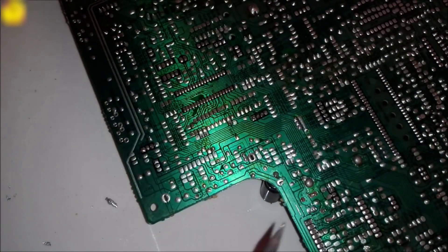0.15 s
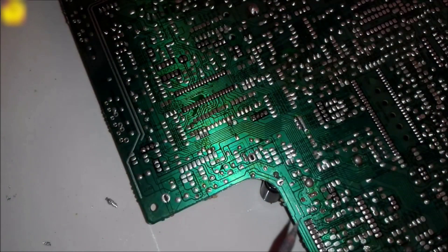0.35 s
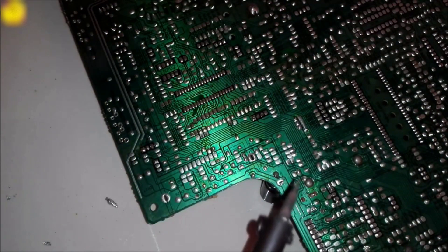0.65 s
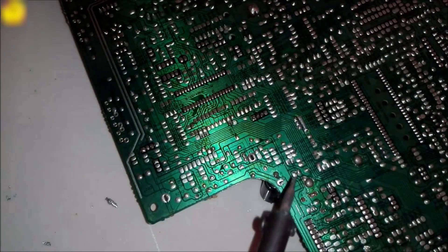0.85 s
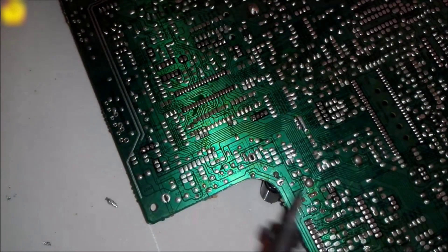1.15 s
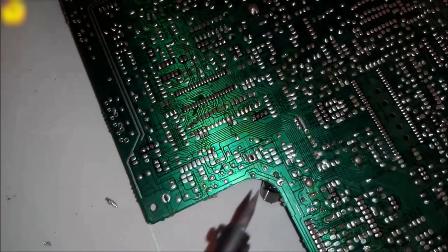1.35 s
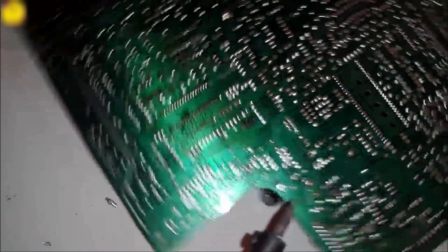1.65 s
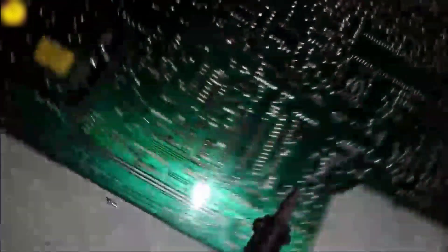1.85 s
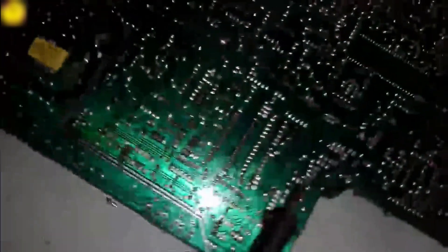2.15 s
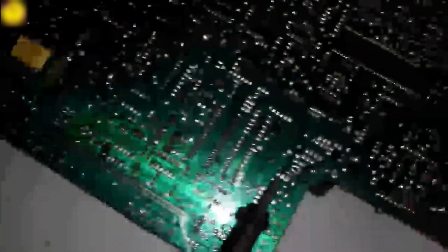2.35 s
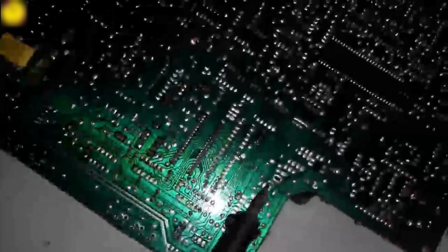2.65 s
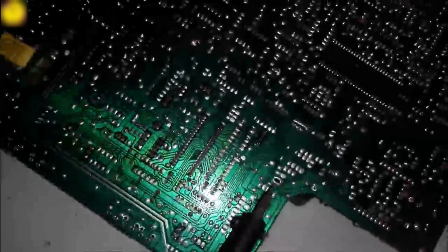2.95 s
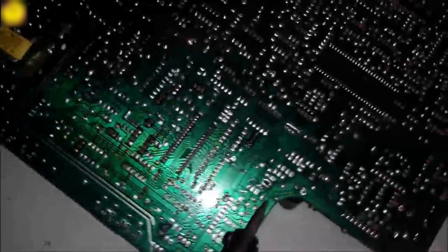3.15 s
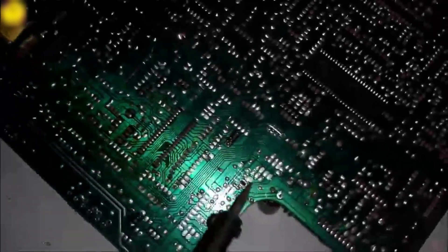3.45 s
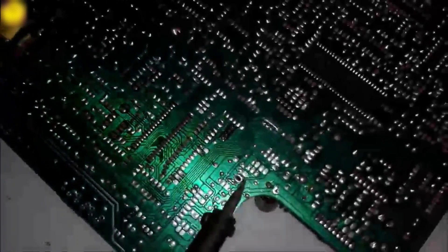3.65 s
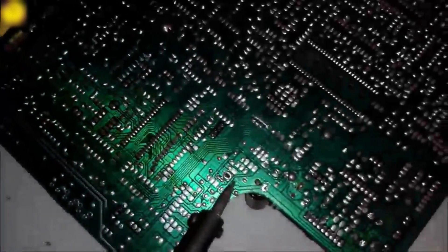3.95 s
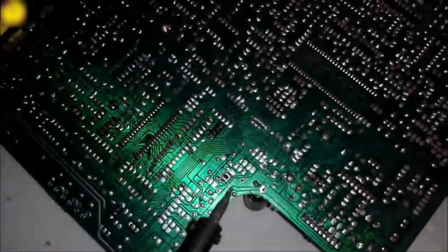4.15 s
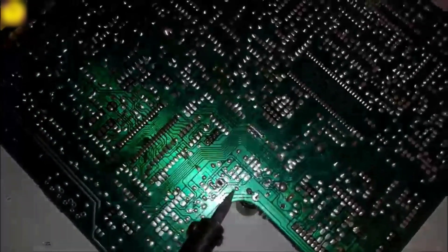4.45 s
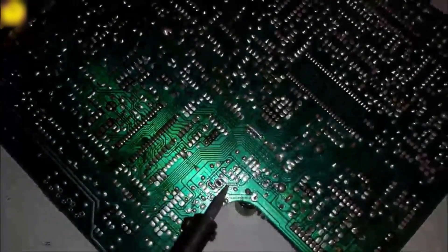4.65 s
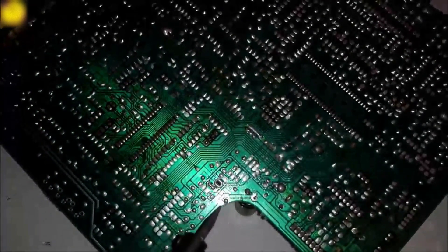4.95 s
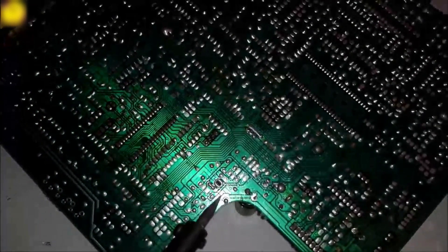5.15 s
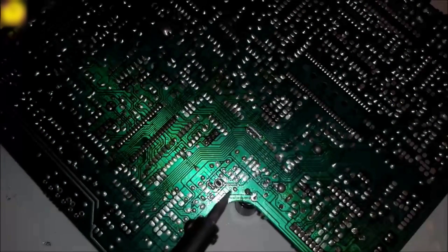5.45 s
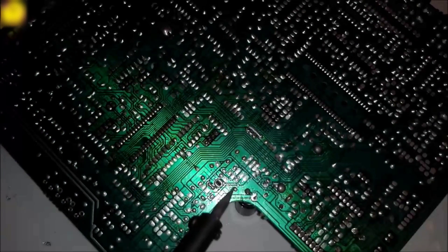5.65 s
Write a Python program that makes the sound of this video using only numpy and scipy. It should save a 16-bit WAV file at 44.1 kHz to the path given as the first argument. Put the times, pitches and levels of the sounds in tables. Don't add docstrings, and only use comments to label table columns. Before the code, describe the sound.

On a workbench in a small hard room, close-miked: a click, a very loud plastic snap and a second snap from a spring pump; a pause; a quick squealing scrape as a circuit board turns and drops; two bright ringing taps from an iron tip, light bounces, small scratchy slips, then quiet hiss and low bench rumble.

```python
import sys
import numpy as np
from scipy import signal
from scipy.fft import rfft, irfft
from scipy.io import wavfile

SR = 44100
rng = np.random.default_rng(int(sys.argv[2]) if len(sys.argv) > 2 else 0)


def boost_factor(decibels):
    exponent = np.asarray(decibels, float) / 20
    return 10 ** exponent


def generate_wav(signal):
    frames = np.transpose(np.atleast_2d(signal))
    scaled = np.clip(frames, -1, 1) * 32767
    pcm = np.round(scaled).astype(np.int16)
    wavfile.write(sys.argv[1], SR, pcm)


N = 255339


def noise():
    return rng.standard_normal(N)


def band(x, low_hz, high_hz):
    return signal.sosfilt(signal.butter(2, [low_hz, high_hz], "band", fs=SR, output="sos"), x)


def rms_one(x):
    return x / np.sqrt(np.mean(x ** 2) + 1e-20)


def coloured(x, spectrum):
    hz, db = np.transpose(spectrum)
    grid = np.fft.rfftfreq(len(x), 1 / SR) + 1
    gain = boost_factor(np.interp(np.log(grid), np.log(hz), db))
    return rms_one(irfft(rfft(x) * gain, len(x)))


def ring(x, hz, t60):
    r, w = boost_factor(-60 / (t60 * SR)), 2 * np.pi * hz / SR
    return signal.lfilter([0, np.sin(w)], [1, -2 * r * np.cos(w), r * r], x)


def swell(s, db, rise_s, fall_s):
    late = np.arange(N) / SR - s
    drop = np.maximum(np.minimum(-late / rise_s, 15), np.minimum(late / fall_s, 15))
    return boost_factor(db - 20 * drop)


def swells(rows):
    return sum(swell(*row) for row in rows)


def grains(per_s, colour):
    sizes = boost_factor(3 * np.minimum(rng.exponential(1, N), 5)) * rng.choice([-1, 1], N)
    return coloured(sizes * (rng.random(N) < per_s / SR), colour)


def scattered_click(shape_db, grid, spread_s, direct):
    half = len(grid) - 1
    fold = np.r_[1, 2 * np.ones(half - 1), 1, np.zeros(half - 1)]
    click = np.exp(rfft(irfft(np.log(boost_factor(shape_db))) * fold))
    scatter = 1
    for lag in np.round(spread_s * SR * rng.uniform(.7, 1.1, 5) * [.07, .13, .27, .55, 1]) + 1:
        late = np.exp(-2j * np.pi * (grid - 1) * lag / SR)
        scatter = scatter * (late - .68) / (1 - 0.7 * late)
    return irfft(click * (scatter - direct))


def strikes(events, colour, spread_s, direct, modes=()):
    out, size = np.zeros((2, N + SR)), 2 ** 13
    grid = np.fft.rfftfreq(size, 1 / SR) + 1
    hz, db = np.transpose(colour)
    body_db = np.interp(np.log(grid), np.log(hz), db)
    for s, peak_db, low_db, top_db, room_db in events:
        tilt_db = np.interp(np.log(grid), np.log([1500, 3000, 8000]), [low_db, 0, top_db])
        hit = scattered_click(body_db + tilt_db, grid, spread_s, direct)
        rings = 0 * hit
        for mode_hz, mode_db, t60 in modes:
            mode_gain = boost_factor(mode_db - 17.0 + rng.normal(0, 3.2))
            rings = rings + mode_gain * ring(hit, mode_hz, min(t60, .07))
        near = hit + rings
        far = boost_factor(room_db) * (1.315 * hit + .5 * rings)
        out[:, round(s * SR):][:, :size] += boost_factor(peak_db) * np.array([near, far]) / np.abs(near).max()
    return out[:, :N]


# frequency in Hz, level in dB per Hz.
HISS_COLOUR = [(180, -43.5), (300, -9.5), (342, -1.5), (411, -12.5), (446, -15), (641, -15), (985, -13),
               (1120, -11.5), (1350, -11.5), (2360, -18.5), (2830, -16.5), (3940, -20), (14300, -24),
               (15500, -31)]


def preamp_hiss():
    return boost_factor(-72.5) * coloured(noise(), HISS_COLOUR)


# frequency in Hz, level in dB per Hz.
RUMBLE_COLOUR = [(12, -32.5), (20, 0), (43, 7), (63, 1), (115, -5), (292, -20), (348, -28), (443, -32.5),
                 (500, -41.5), (650, -57), (1100, -120)]
# start in seconds, level in dB, t60 in seconds.
THUDS = [
    (1.809, -40.5, 0.35),
    (2.389, -34.5, 0.45),
    (3.645, -37, 0.5),
    (3.771, -53, 0.22),
    (3.876, -50.5, 0.65),
    (3.995, -52.5, 0.18),
    (4.49, -44, 0.28),
]
# peak in seconds, level in dB, rise in seconds, fall in seconds.
LEANS = [
    (1.74, -63, 0.46, 0.3),
    (1.95, -55.5, 0.05, 0.15),
    (2.4, -57.5, 0.23, 0.17),
    (2.69, -69.5, .2, .4),
    (3.29, -59.5, 0.6, 0.33),
    (3.82, -49.5, 0.28, 0.365),
    (4.61, -58, 0.39, 0.68),
    (5.32, -69.5, 0.56, 0.5),
]


def bench():
    t = np.arange(N) / SR
    level = boost_factor(-57.5 - 0.73 * t) + swells(LEANS)
    for s, db, t60 in THUDS:
        onset = (t > s) * np.clip((t - s) / 0.0056, 0, 1)
        level = level + onset * boost_factor(db - 60 * np.abs(t - s) / t60)
    return level * band(coloured(noise(), RUMBLE_COLOUR), 40, 2000)


# peak in seconds, level in dB, rise in seconds, fall in seconds.
WHINE_SWELL = (5, -83.5, 0.27, 2)
# peak in seconds, level in dB, rise in seconds, fall in seconds.
SQUEAKS = [
    (2.95, -72, .3, .3),
    (3.1, -80, .2, 0.034),
    (3.29, -77.5, 0.26, .1),
]


def squeak():
    whine = swell(*WHINE_SWELL) * rms_one(ring(noise(), 2838, .012))
    turns = 1692 * np.arange(N) / SR
    tone = np.sin(2 * np.pi * turns) + 0.84 * np.sin(np.pi * turns)
    return whine + swells(SQUEAKS) * tone


# frequency in Hz, t60 in seconds, level in dB.
ROOM_DECAY = [(203, 0.23, -3), (464, 0.35, 3), (1166, 0.32, -3), (3500, 0.33, -2.5), (7113, 0.28, -3.5),
              (13800, 0.063, 3.5)]


def room(x):
    t, tail = np.arange(SR // 2) / SR, 0
    hz, t60, db = np.transpose(ROOM_DECAY)
    edges = 150 * 2 ** np.arange(0, 7.1, .5)
    for low, high in zip(edges, edges[1:]):
        centre = np.log(low * high) / 2
        band_db = np.interp(centre, np.log(hz), db)
        band_t60 = np.interp(centre, np.log(hz), t60)
        tail = tail + band(rng.standard_normal(len(t)), low, high) * boost_factor(band_db - 60 * t / band_t60)
    tail = tail * np.clip((t - .006) / 0.0011, 0, 1)
    return signal.fftconvolve(x, tail / np.sqrt(np.sum(tail ** 2)))[:N]


# start in seconds, pitch in Hz, level in dB, t60 in seconds.
RINGS = [(.301, 940, -47.5, 0.095), (.371, 764, -39, 0.11), (0.778, 2740, -52.5, 0.084),
         (1.469, 1027, -37, 0.127), (1.685, 1410, -25.5, 0.06), (1.686, 4600, -35.5, .06),
         (1.686, 7070, -40.5, .05), (2.857, 1360, -49.5, 0.087), (2.871, 1162, -62, 0.15),
         (3.037, 1348, -57, 0.064), (3.873, 1090, -36, 0.34), (3.991, 1093, -34.5, 0.24),
         (4.389, 1348, -49, .1), (4.39, 2640, -44.5, 0.049), (4.486, 1140, -36, 0.14),
         (4.678, 1140, -43.5, 0.137), (1.868, 930, -23, 0.067), (1.882, 873, -21.5, .06),
         (1.875, 1590, -22, 0.089), (1.905, 1178, -28, 0.17), (2.39, 1107, -26.5, .35),
         (2.389, 1570, -30, 0.12), (1.925, 290, -32.5, .3), (1.88, 685, -38, 0.51), (2.4, 320, -45.5, .4),
         (1.469, 4970, -34, 0.0475), (1.48, 1120, -52, .4), (2.859, 5176, -58, 0.081),
         (2.859, 3760, -54.5, .12), (2.86, 4370, -50, 0.15), (3.3, 1507, -59.5, 0.23),
         (3.355, 927, -57, .12), (3.399, 1590, -61, 0.18), (3.769, 1081, -33, 0.19),
         (3.644, 1114, -35.5, 0.26), (3.994, 2360, -41, 0.163), (4.39, 5130, -34, 0.11),
         (4.485, 5220, -38, .08), (4.484, 1510, -34, .1), (4.587, 5070, -38, .1), (4.588, 1350, -46, .1),
         (4.676, 5090, -42, .08), (4.677, 940, -41.5, 0.16), (4.678, 1523, -35, 0.104),
         (4.769, 2700, -56, .06), (4.769, 5190, -51, .1), (0.778, 7500, -53, .1), (.781, 10100, -44, 0.063),
         (1.813, 354, -53.5, .2), (1.928, 345, -49.5, .2)]


def after_rings():
    out, t = np.zeros(N), np.arange(SR // 2) / SR
    for s, hz, db, t60 in RINGS:
        tremble = rng.standard_normal(len(t)) * boost_factor(-60 * t / t60) * (.35 + (t < .003))
        ping = ring(tremble, hz, min(t60 / 2, 70 / hz, .08))
        out[round(s * SR):][:len(ping)] += boost_factor(db) * ping / np.abs(ping).max()
    return out


# pitch in Hz, level in dB, t60 in seconds.
JOINTS = [(966, -23.5, 0.048), (1225, -25.5, 0.058), (1555, -24.5, 0.031), (1806, -27, 0.038),
          (2930, -27, 0.015), (4510, -21, 0.068), (5256, -13, 0.02), (6367, -21, 0.025)]
# start in seconds, peak in dB, low tilt in dB, top tilt in dB, room in dB.
SHIFTS = [(1.468, -28.5, 6.5, 7.5, -8.5), (1.7174, -22.5, 1, -24, -21.5), (1.8043, -18.5, 0, -2, -11.5),
          (1.8285, -21, -4.5, -8, -11.5), (1.8427, -28, -8, -0.5, -12.5), (1.8487, -23, -6.5, 0, -12),
          (1.862, -22.5, -7, 1, -12), (1.8742, -13.5, -3, 1, -22.5), (1.881, -11.5, 1.5, 6.5, -13.5),
          (1.8865, -14, 1.5, 1.5, -14), (1.893, -21.5, 0.5, 0.5, -17.5), (1.926, -31.5, 2.5, -4, -10),
          (1.939, -33, 0, 0, -2), (2.0185, -32.5, -6.5, -7.5, -10.5), (2.046, -39, 7, 2, -8),
          (2.8575, -48, -7.5, -3, -5), (3.035, -58, 9, -7, -6.5)]
# frequency in Hz, level in dB per Hz.
SHIFT_COLOUR = [(180, -52.5), (300, -35), (568, -16.5), (991, -2), (1370, -2), (1790, -2.5), (2360, -14.5),
                (3730, -8.5), (4470, -17.5), (4850, -9.5), (10600, -24), (12300, -29), (14000, -47),
                (15000, -60.5)]
# start in seconds, peak in dB, low tilt in dB, top tilt in dB, room in dB.
GRAB = [
    (1.684, -21, 3, 2.5, -9.5),
]
# frequency in Hz, level in dB per Hz.
GRAB_COLOUR = [(180, -47.5), (300, -15.5), (1040, -30), (1350, -4), (2320, -21.5), (4120, -14.5),
               (4470, -6), (4850, -20), (5260, -10.5), (5710, -24.5), (7920, -17.5), (10100, -29.5),
               (12300, -14), (15000, -56.5)]


def board_shifts():
    shifts = strikes(SHIFTS, SHIFT_COLOUR, spread_s=.0018, direct=0.36, modes=JOINTS)
    return shifts + strikes(GRAB, GRAB_COLOUR, spread_s=0.0025, direct=0.39)


# start in seconds, peak in dB, low tilt in dB, top tilt in dB, room in dB.
TAPS = [
    (2.386, -7.5, -4.5, -2, -11),
    (3.641, -9, -5, -0.5, -14),
    (3.659, -18, -6.5, -5, -10),
    (3.7675, -16.5, -4, -5.5, -12.5),
    (3.874, -19, -5.5, -5.5, -12),
    (3.957, -36, 7, -23, -1),
    (3.992, -26.5, -3, -16, -13),
]
# frequency in Hz, level in dB per Hz.
TAP_COLOUR = [(88, -46.5), (150, -14), (468, -27.5), (700, -23), (1070, -0.5), (1300, -8.5), (1600, -6.5),
              (2050, -14.5), (2500, -14), (3090, -4), (4720, -13), (6430, -16.5), (6940, -12.5),
              (13600, -33.5), (15000, -46.5)]
# pitch in Hz, level in dB, t60 in seconds.
BOARD_MODES = [(876, -19, 0.11), (1102.4, -16, 0.055), (1440, -36, 0.042), (1590, -16.5, 0.035),
               (1740, -21.5, 0.071), (2395, -21, 0.074), (2888, -20, 0.036), (3035.3, -13.5, 0.017),
               (3405, -24.5, 0.068), (3870, -23, 0.15), (4600, -27.5, .04), (5468, -20.5, 0.12),
               (6285, -16.5, 0.0402), (6435, -16, 0.081), (7646, -28, .04), (8300, -22.5, 0.085)]
# start in seconds, peak in dB, low tilt in dB, top tilt in dB, room in dB.
NUDGES = [
    (4.389, -28.5, -2.5, 6.5, -9),
    (4.484, -21, 4, 2.5, -12.5),
    (4.532, -39.5, -1.5, -26, -17),
    (4.586, -35, -5.5, -1.5, -11),
    (4.675, -27.5, 5.5, -1.5, -12),
    (4.768, -42.5, -5.5, -8, -9.5),
    (5.021, -63.5, -5.5, 24, -11),
]
# frequency in Hz, level in dB per Hz.
NUDGE_COLOUR = [(180, -22.5), (300, -24), (532, -36.5), (800, -15), (1170, -3.5), (1820, -6.5), (2300, -17),
                (2700, -16), (3100, -16), (4300, -20.5), (5180, -11), (5530, -15), (6300, -15), (9180, -26),
                (9960, -37), (12300, -35), (15000, -53)]


def iron_tip():
    taps = strikes(TAPS, TAP_COLOUR, spread_s=.0014, direct=.12, modes=BOARD_MODES)
    return taps + strikes(NUDGES, NUDGE_COLOUR, spread_s=.0018, direct=0.34, modes=JOINTS)


# frequency in Hz, level in dB per Hz.
SCRAPE_COLOUR = [(290, -57.5), (500, -30), (922, -5.5), (2070, -5.5), (3460, -18), (3990, -12), (5380, -26),
                 (11400, -30), (14000, -35.5), (15000, -51.5)]
# peak in seconds, level in dB, rise in seconds, fall in seconds, brightness in dB.
STROKES = [(1.514, -66, 0.076, 0.011, 7), (1.668, -53.5, 0.08, 0.029, -2.5),
           (1.722, -42.5, 0.027, .06, -35.5), (1.795, -75.5, 0.021, .01, 13),
           (1.832, -26, 0.0097, 0.029, -30), (1.872, -56.5, 0.021, 0.027, 21),
           (1.984, -49.5, 0.038, 0.26, -17.5), (2.87, -80, 0.011, 0.124, -11), (3.12, -72, 0.29, .5, -9),
           (3.366, -61, 0.09, .06, -9.5), (4.42, -78.5, 0.064, .3, 2.5), (4.582, -80, 0.032, .15, 13),
           (4.684, -61, 0.034, 0.16, -5), (4.768, -91, 0.12, .12, 5)]


def scrape():
    catches = grains(5500, SCRAPE_COLOUR)
    joints = sum(ring(catches, hz, t60 / 2) for hz, db, t60 in JOINTS)
    dull = rms_one(band(catches + boost_factor(-31.0) * joints, 660, 2400))
    bright = rms_one(band(catches, 1900, 15000))
    return sum(swell(*row) * (dull + boost_factor(bright_db) * bright) for *row, bright_db in STROKES)


# peak in seconds, level in dB, rise in seconds, fall in seconds.
FLEXES = [(1.5, -61, 0.04, 0.074), (1.65, -57, 0.15, 0.092), (1.723, -50.5, 0.072, 0.088),
          (1.789, -53, 0.062, 0.0114), (1.835, -37, 0.0113, 0.068), (1.942, -44.5, 0.066, 0.031),
          (2.078, -57.5, .2, 0.0676), (3.124, -64, 0.154, 0.23), (3.406, -69.5, .03, .03),
          (4.551, -53, 0.194, .05), (4.768, -59.5, 0.27, .09)]


def plate_boom():
    return swells(FLEXES) * rms_one(band(noise(), 85, 270))


# peak in seconds, level in dB, rise in seconds, fall in seconds.
HUM_SWELL = (1.868, -29, 0.18, 0.1121)
# peak in seconds, level in dB, rise in seconds, fall in seconds.
TEARS = [
    (1.855, -30.5, 0.025, .05),
    (1.879, -21.5, .03, 0.031),
]
# frequency in Hz, level in dB per Hz.
TEAR_COLOUR = [(290, -54), (500, -28), (909, -2.5), (1030, 0.5), (1580, -2), (2460, -17.5), (2680, -11.5),
               (3370, -10.5), (4050, -20.5), (5380, -9), (7910, -20), (11600, -21), (14000, -29),
               (15000, -49.5)]
# pitch in Hz, level in dB, t60 in seconds.
PLATE_MODES = [(293, -49, 0.54), (354, -28.5, .16), (685, -37.5, 0.29), (863.3, -38.5, .2),
               (1166, -30, 0.2)]


def squeal_and_tear():
    peak_s, peak_db = 1.833, -11.5
    start_hz, sag_hz_per_s = 1178, 150
    held = swell(peak_s + 0.0056, peak_db - 4.0, .09, 0.011)
    squeal = np.maximum(swell(peak_s, peak_db, .022, 0.027), held)
    tear = swells(TEARS)
    shake = (tear + boost_factor(-14) * squeal) * noise()
    out = tear * grains(3000, TEAR_COLOUR)
    out += sum(boost_factor(db - 13.5) * ring(shake, hz, t60) for hz, db, t60 in PLATE_MODES)
    late = np.arange(N) / SR - peak_s
    slipping = late > -.0305
    turns = start_hz * late - sag_hz_per_s * late ** 2 / 2
    out += squeal * slipping * (late < .026) * np.sin(2 * np.pi * turns)
    out += swell(*HUM_SWELL) * slipping * np.sin(2 * np.pi * 353.5 * late)
    return out


def drag():
    return (scrape() + plate_boom() + squeal_and_tear()) * [[1], [boost_factor(-16.5)]]


# start in seconds, peak in dB, low tilt in dB, top tilt in dB, room in dB.
TICKS = [
    (0.1475, -32.5, -34, -5, -12),
    (0.3016, -35, 10, -18, -10),
    (0.5255, -14, 14, 7.5, -6.5),
    (0.776, -32, 11, 11, -16),
    (1.0608, -53, -3.5, 1.5, -12),
]
# frequency in Hz, level in dB per Hz.
TICK_COLOUR = [(290, -58.5), (500, -29), (1160, -17.5), (2070, -19), (2610, -4.5), (3320, -14),
               (3560, -0.5), (3940, -16.5), (5380, 0.5), (6760, -16.5), (7470, -5.5), (13400, -14.5),
               (15000, -20)]
# start in seconds, peak in dB, low tilt in dB, top tilt in dB, room in dB.
LATCH = [
    (0.172, -12.5, 0, -1, -19.5),
]
# frequency in Hz, level in dB per Hz.
LATCH_COLOUR = [(180, -61.5), (300, -42.5), (855, -37.5), (1300, -5), (1620, 2), (2070, -8.5),
                (3070, -20.5), (3330, -16.5), (4320, -26), (5440, -12.5), (6400, -23), (7920, -19.5),
                (12500, -45), (15000, -62.5)]
# start in seconds, peak in dB, low tilt in dB, top tilt in dB, room in dB.
FIRE = [
    (0.335, 0.5, -4, -2.5, -19),
]
# frequency in Hz, level in dB per Hz.
FIRE_COLOUR = [(180, -62.5), (300, -38), (637, -35), (855, -7), (1270, -13), (3490, -7.5), (3730, -10),
               (4050, -11), (5260, -2), (7060, -9), (9800, -7.5), (10500, -10), (13400, -5.5),
               (15000, -30.5)]
# start in seconds, peak in dB, low tilt in dB, top tilt in dB, room in dB.
STOP = [
    (.372, -39, 14.5, -33, -23),
    (.5311, -17, -5, -1, -21),
    (.5324, -2.5, -1, -1.5, -21),
]
# frequency in Hz, level in dB per Hz.
STOP_COLOUR = [(59, -65.5), (100, -28.5), (620, -13), (885, -1), (1350, -2), (1920, -12), (2370, -7),
               (2920, -14), (3600, 3), (4500, -3), (5040, -9.5), (5480, -8.5), (12200, -10), (14100, -22.5),
               (15000, -40)]


def pump_snaps():
    snaps = strikes(TICKS, TICK_COLOUR, spread_s=0.001, direct=0.42)
    snaps += strikes(LATCH, LATCH_COLOUR, spread_s=0.00052, direct=0.23)
    snaps += strikes(FIRE, FIRE_COLOUR, spread_s=0.00055, direct=0.36)
    snaps += strikes(STOP, STOP_COLOUR, spread_s=.00025, direct=0.19)
    desk_echo_s = .0056
    snaps[0] += boost_factor(-10.0) * band(np.roll(snaps[0], round(desk_echo_s * SR)), 3500, 15000)
    return snaps


# peak in seconds, level in dB, rise in seconds, fall in seconds.
SLIDE = [(.185, -63, .005, .3), (0.348, -49, .005, 0.3), (.29, -60.5, 0.105, .02),
         (0.311, -52, 0.03, 0.088), (0.524, -39, 0.0046, .01), (0.601, -46.5, 0.081, 0.02),
         (.64, -54.5, .05, 0.0197), (.715, -63.5, 0.0154, 0.033), (.782, -51.5, 0.0027, 0.039),
         (.84, -64, 0.0207, 0.026)]


def piston_rub():
    return swells(SLIDE) * grains(4100, TICK_COLOUR)


# start in seconds, pitch in Hz, level in dB, t60 in seconds.
SPRING = [(.598, 5770, -37.5, 0.032), (0.36, 4200, -39.5, 0.053), (.708, 4600, -61, 0.058),
          (0.71, 3620, -57.5, 0.16), (.78, 6000, -56, 0.097), (.832, 5900, -61, 0.059),
          (0.43, 5000, -55.5, .04), (.835, 5600, -69, 0.067), (1.2, 6400, -61.5, 0.046)]


def coil_pings():
    out, t = np.zeros(N), np.arange(N) / SR
    for s, hz, db, t60 in SPRING:
        jolt = noise() * (np.abs(t - s - .004) < .004)
        ping = ring(jolt + 1e-18, hz, t60)
        out += boost_factor(db) * ping / np.abs(ping).max()
    return out


def pump():
    return pump_snaps() + (piston_rub() + coil_pings()) * [[1], [boost_factor(-18.5)]]


def scene():
    dry, feed = board_shifts() + iron_tip() + drag() + pump()
    background = preamp_hiss() + bench() + squeak()
    return (background + room(feed) + after_rings() + dry)[None]


def band_limit(x):
    return signal.sosfilt(signal.butter(12, 15700, fs=SR, output="sos"), x)


def record(dry):
    cut = signal.sosfilt(signal.ellip(8, .5, 26, 14450, fs=SR, output="sos"), dry)
    return band_limit(np.clip(cut, -1, 1))


dry = scene()
out = record(dry)
generate_wav(out)
```